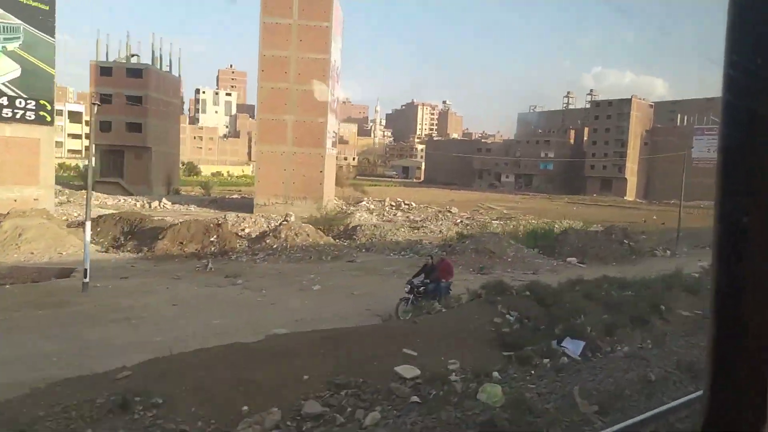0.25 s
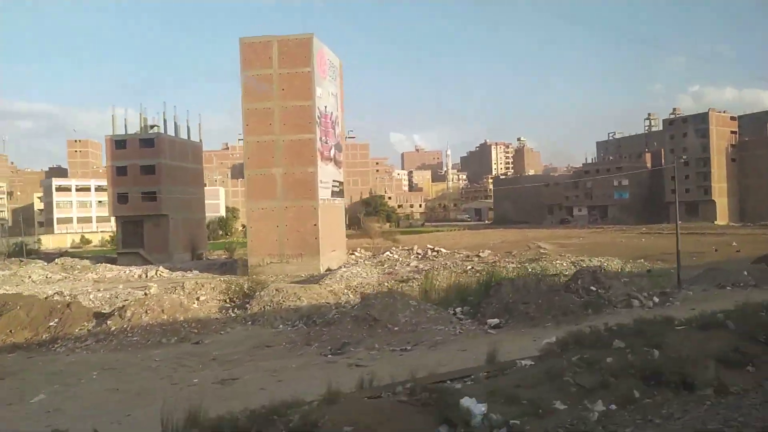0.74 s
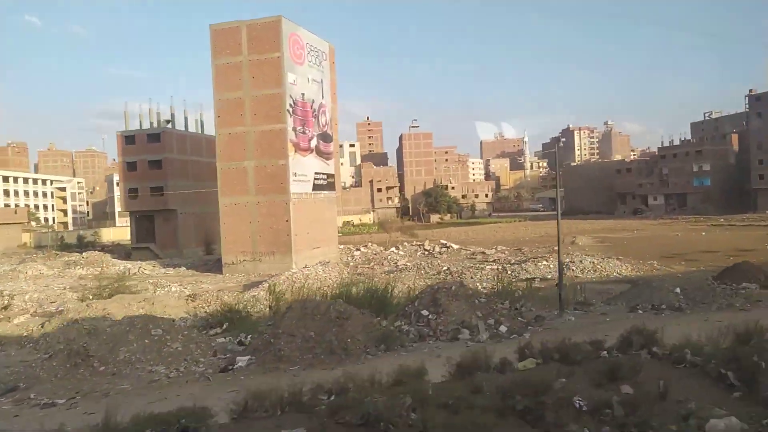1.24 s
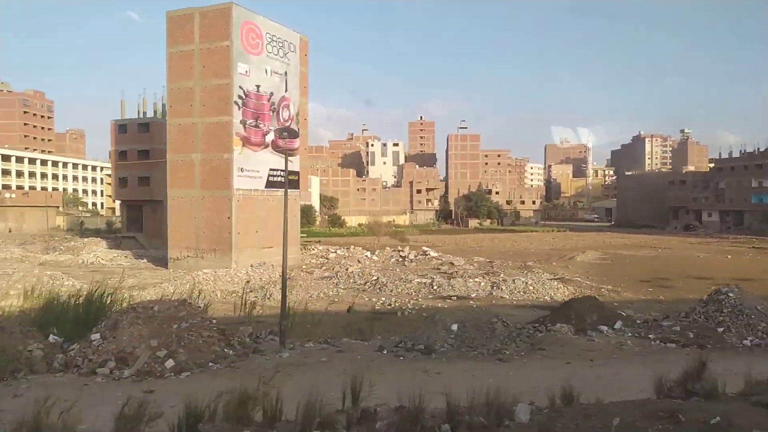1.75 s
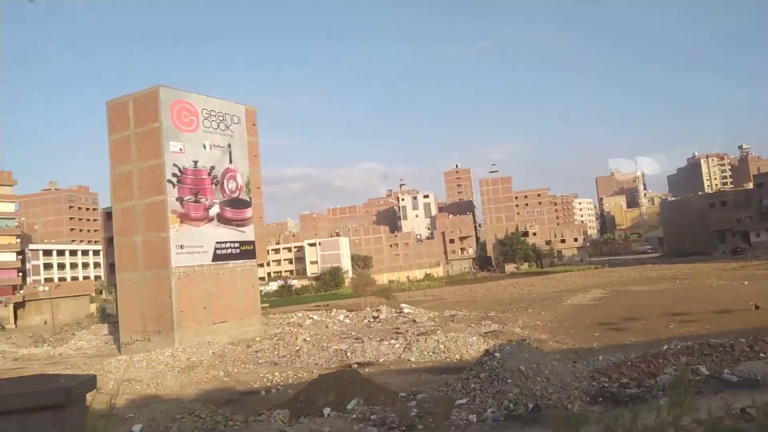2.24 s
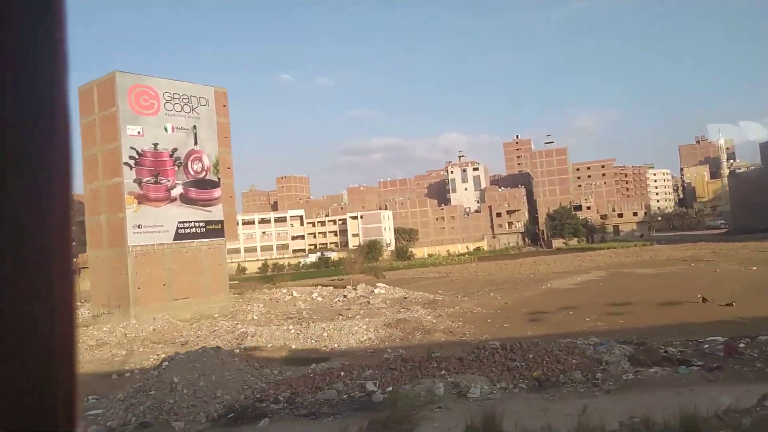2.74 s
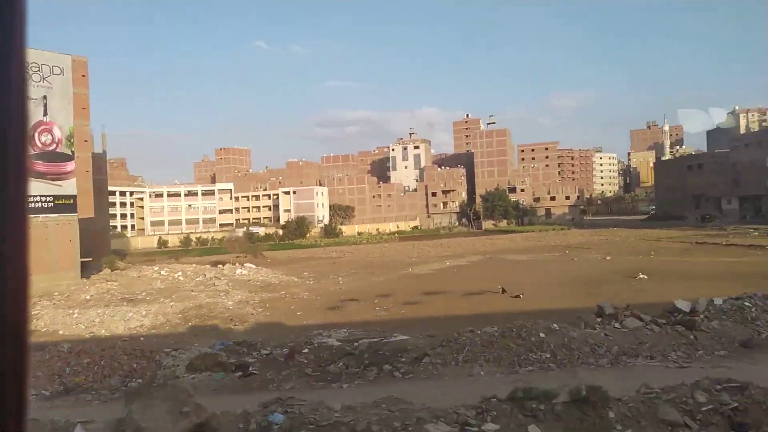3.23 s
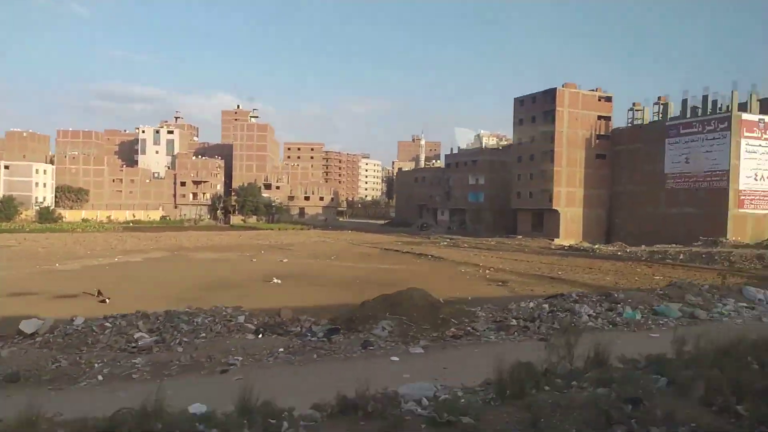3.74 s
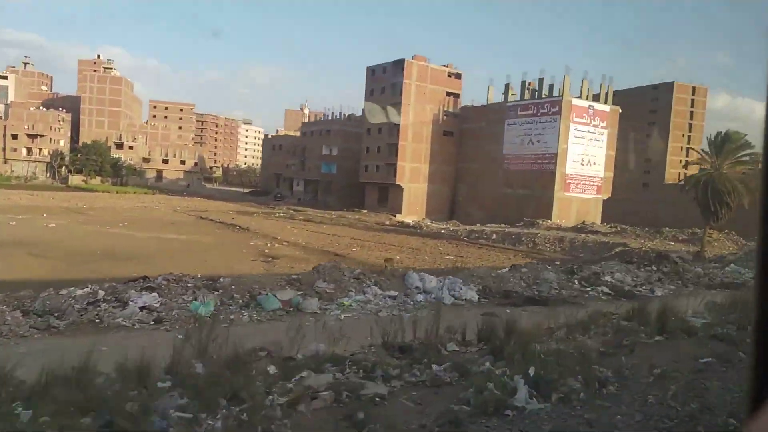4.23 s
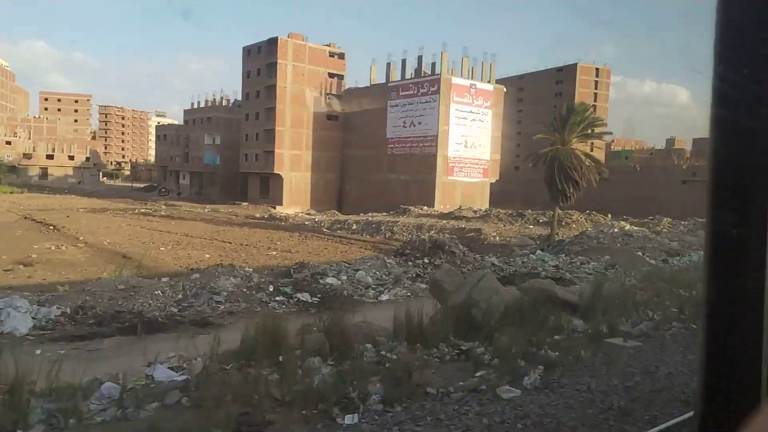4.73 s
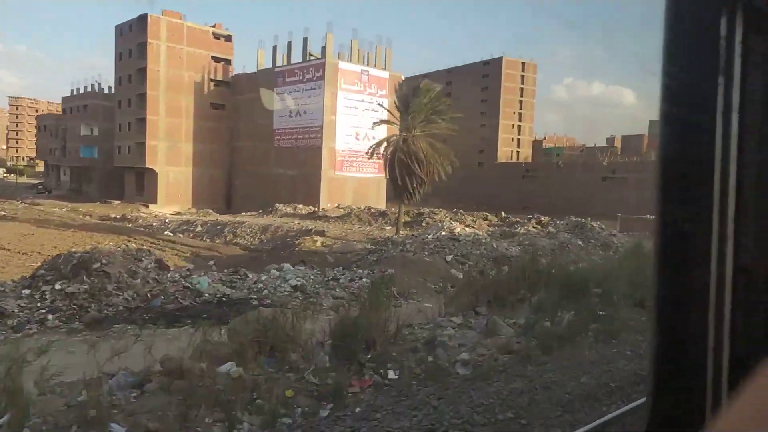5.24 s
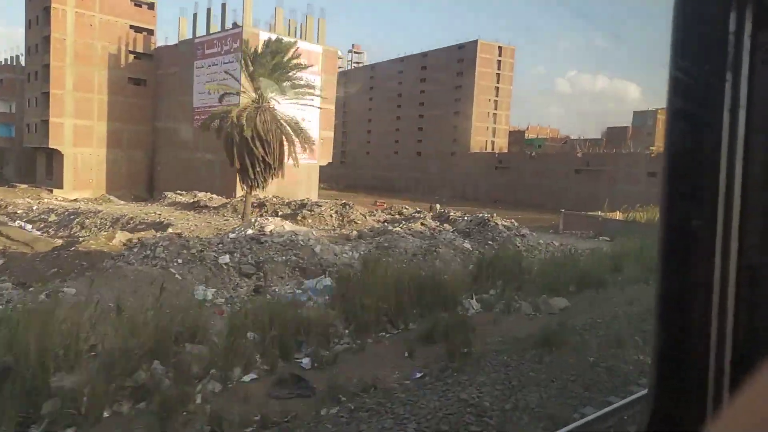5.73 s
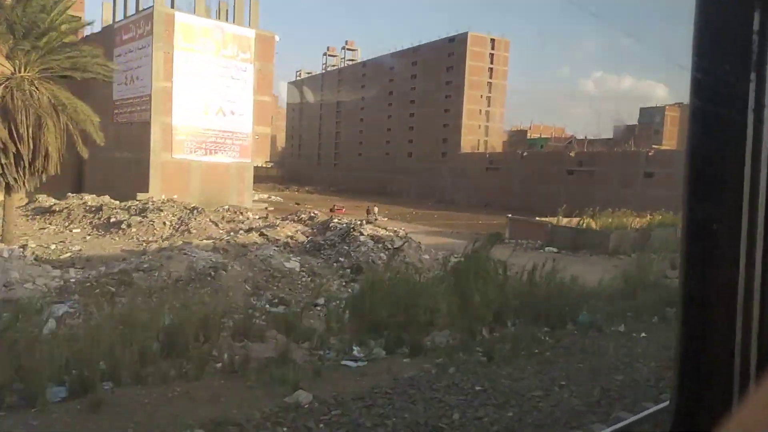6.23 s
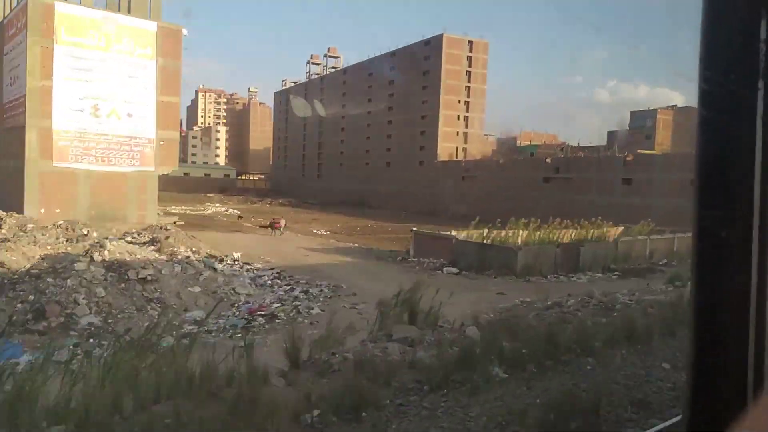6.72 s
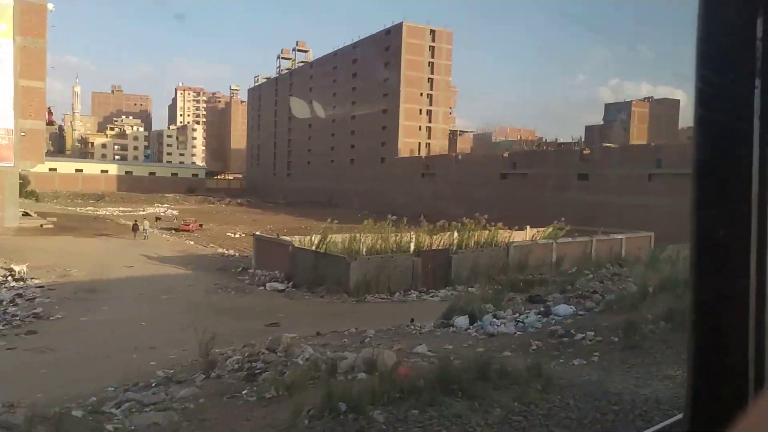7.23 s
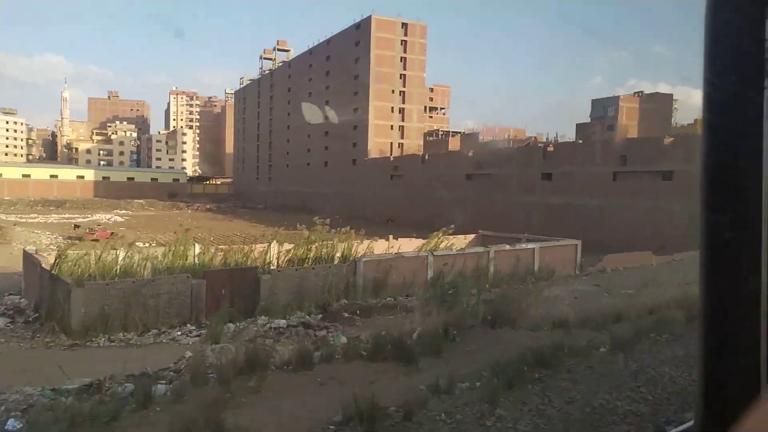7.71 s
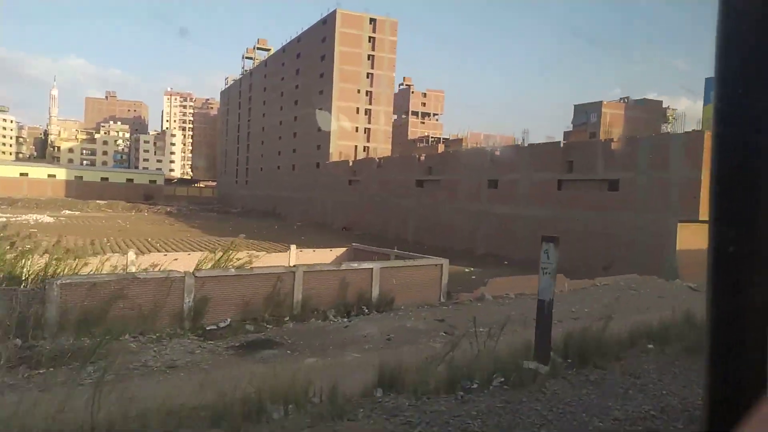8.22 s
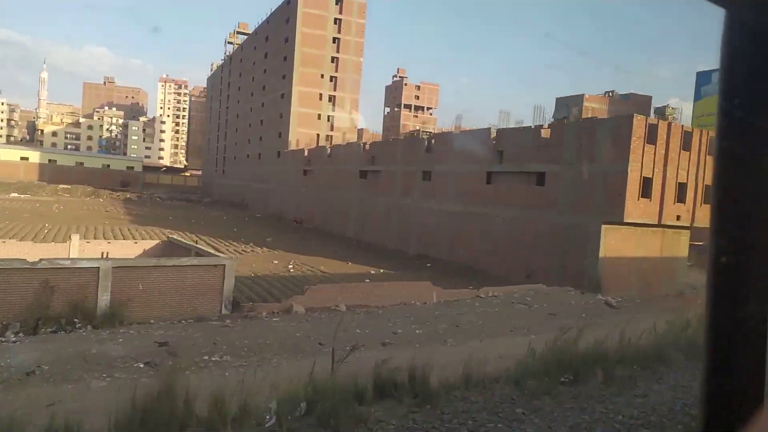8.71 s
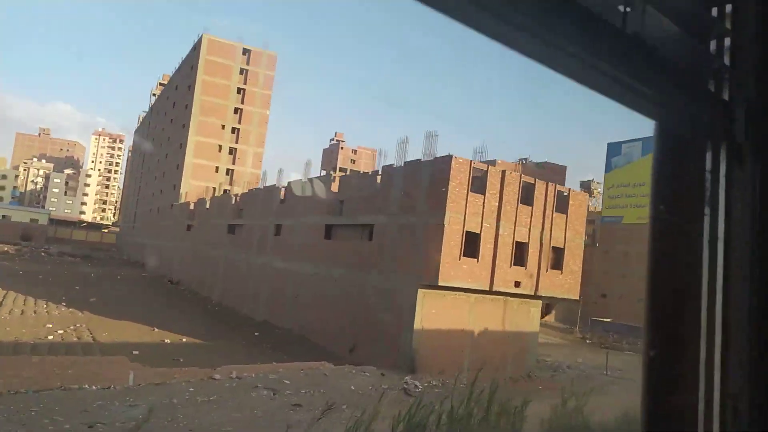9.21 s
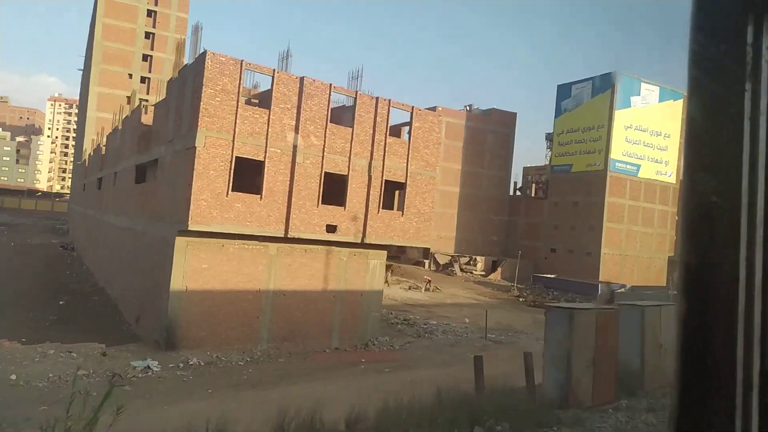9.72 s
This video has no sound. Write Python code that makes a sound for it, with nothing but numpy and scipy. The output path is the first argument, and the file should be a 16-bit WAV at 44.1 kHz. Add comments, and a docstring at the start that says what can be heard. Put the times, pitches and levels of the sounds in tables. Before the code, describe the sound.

Inside a moving train carriage, a deep steady rumble with soft uneven wheel bumps, low lurching thuds, muffled rolling noise and faint rattling fittings.

```python
"""Inside a rolling train carriage

The car body booms, the floor drums and the wall panels hum: noise shaped by resonances, louder on rough rail.
Lurches and wheel bumps add short low swings. Rolling noise comes through the walls, with wheel and rail singing.
Loose fittings rattle (patchy treble noise), knock (short bursts) and clink (two fading tones).
A joint squeaks very high as a sliding tone, and there is one short airy hiss."""
import sys
import numpy as np
from scipy import signal
from scipy.fft import rfft, irfft, next_fast_len
from scipy.io import wavfile
from scipy.ndimage import uniform_filter1d, map_coordinates

SR = 44100
rng = np.random.default_rng(int(sys.argv[2]) if len(sys.argv) > 2 else 0)


def generate_wav(sig):
    """Save sig (samples, or channels by samples) to the path in sys.argv[1] as 16-bit PCM at SR."""
    pcm = np.round(np.clip(np.atleast_2d(sig).T, -1, 1) * 32767).astype(np.int16)
    wavfile.write(sys.argv[1], SR, pcm)


N = 439236

# Lurches of the car body. Each row: time in seconds, peak level in dB, pitch at the peak in Hz.
LURCHES = [(0.176, -20.5, 58.6), (0.519, -26, 66), (0.595, -25, 80.5), (0.646, -18, 65.6),
           (1.201, -25, 69.6), (1.326, -18.5, 67.5), (1.372, -21, 58), (1.427, -17, 65), (1.52, -21, 58.5),
           (2.656, -24, 61.7), (2.702, -21, 73.6), (2.837, -19.5, 64), (2.956, -16, 64.5),
           (3.008, -13, 73.5), (3.076, -17, 61.5), (3.148, -18, 68), (3.414, -21, 69), (3.487, -22.5, 61.5),
           (3.738, -18.5, 62.4), (3.811, -28, 62), (3.929, -19, 66.5), (4.011, -25, 64.5), (4.354, -23, 77),
           (4.508, -22.5, 65.5), (4.759, -27, 71), (5.575, -21.5, 63), (5.625, -21, 62), (5.719, -21.5, 65),
           (7.041, -19.5, 62.7), (7.653, -25, 85), (7.763, -27, 83), (7.892, -23.5, 70.4), (7.943, -23, 73),
           (8.356, -23.5, 71), (9.257, -24.5, 67), (9.495, -23.5, 72.5)]
# Strong wheel bumps into the floor. Each row: time in seconds, peak level in dB, pitch in Hz.
STRONG_BUMPS = [(0.029, -23.5, 188), (0.125, -24, 186), (0.269, -26, 177), (0.494, -22, 175),
                (0.613, -19, 182), (0.736, -23, 191), (0.787, -21, 225), (1.072, -20.5, 173),
                (1.307, -16.5, 181), (1.41, -15.5, 190), (2.167, -25, 186), (2.269, -25, 173),
                (2.37, -22, 182), (2.538, -24, 186), (2.583, -20.5, 182), (2.707, -21, 184),
                (2.804, -19.5, 201), (2.921, -21, 193), (2.946, -20, 170), (2.998, -19, 185),
                (3.059, -15.5, 179), (3.106, -20.5, 178), (3.205, -22.5, 182), (3.245, -27, 200),
                (3.317, -19.5, 181), (3.618, -23, 189), (3.716, -23, 203), (3.781, -19, 200),
                (3.89, -17.5, 168), (4.21, -20, 180), (4.348, -20, 191), (4.442, -20, 180),
                (4.569, -22, 188), (4.815, -24.5, 195), (4.991, -23.5, 191), (5.1, -15.5, 179),
                (5.148, -20, 187), (5.33, -24, 193), (5.511, -21.5, 181), (6.176, -24, 188),
                (7.024, -21.5, 185), (7.279, -23, 178), (7.389, -19, 177), (7.494, -17.5, 177),
                (7.77, -17, 184), (7.869, -28, 198), (8.319, -31, 190), (8.422, -19.5, 181),
                (8.973, -23, 196), (9.139, -20.5, 172), (9.242, -20.5, 170), (9.298, -23.5, 197),
                (9.368, -22, 193), (9.471, -27, 180), (9.585, -21, 187), (9.681, -24.5, 202),
                (9.784, -24, 184)]
# Resonances of the wall panels. Each row: pitch in Hz, width in Hz, level in dB relative to each other.
WALL_PANELS = [(292, 81, 0), (363.8, 91, -0.5), (467, 154, -6)]
# The hardest jolt lifts rolling noise and wall panels: time in seconds, lift in dB, rise and fall in seconds.
HARDEST_JOLT = (3.012, 5.7, .02, 0.053)
LURCH_RISE_S, LURCH_FALL_S = 0.012, 0.022
BUMP_RISE_S, BUMP_FALL_S = 0.0091, 0.012


def amp(db):
    """Gain of a level in dB."""
    return 10 ** (np.asarray(db) / 20)


def unit(x):
    """Scale a sound to an rms of 1."""
    return x / np.sqrt(np.mean(x ** 2) + 1e-20)


def along(points, hz):
    """Read the columns of (Hz, value, ..) points at given frequencies, on a log axis."""
    knots, *columns = np.transpose(points)
    return np.squeeze([np.interp(np.log(hz + 1), np.log(knots + 1), column) for column in columns])


def curves(rows):
    """One value per sample for each column after the time."""
    times, *columns = np.transpose(rows)
    return [np.interp(np.arange(N) / SR, times, column) for column in columns]


def wobble(rate):
    """A smooth random curve through `rate` random points a second."""
    points = rng.standard_normal(int(N * rate / SR) + 4)
    return map_coordinates(points, [np.arange(N) * rate / SR])


def swells(rows):
    """Sum of bell-shaped swells (time s, height, rise s, fall s), drawn at 1000 points a second."""
    t = np.arange(0, N / SR, 1 / 1000)
    total = sum(height * np.exp(-.5 * ((t - s) / np.where(t < s, rise, fall)) ** 2)
                for s, height, rise, fall in rows)
    return np.interp(np.arange(N) / SR, t, total)


def filtered(x, response):
    """Apply a gain that depends on frequency."""
    m = next_fast_len(N + SR // 2)
    return irfft(rfft(x, m) * response(np.fft.rfftfreq(m, 1 / SR)), m)[..., :N]


def modes(table):
    """Gain of steep resonances (Hz, width Hz, dB) whose powers add."""
    def gain(f):
        power = 0
        for centre, width, db in table:
            resonance = (f * width) ** 2 / ((centre * centre - f * f) ** 2 + (f * width) ** 2)
            power = power + (amp(db) * resonance) ** 2
        return np.sqrt(power)
    return gain


def patchy(pair, depth_db, tall, long):
    """Noise with patches of random gain, tall frequency bins by long time frames."""
    spectrum = signal.stft(pair, nperseg=512)[2]
    field = rng.standard_normal(spectrum.shape[1:])
    field = uniform_filter1d(field, size=round(tall), axis=0)
    field = uniform_filter1d(field, size=round(long), axis=1)
    return signal.istft(spectrum * amp(depth_db * unit(field)), nperseg=512)[1][:, :N]


def rush(gain, patchy_db=None, tall=8, long=8):
    """Coloured stereo noise of rms 1, nearly alike in both ears only in the bass."""
    # Each row: frequency in Hz, left-right likeness from 0 to 1, phase lead of the right ear in radians.
    ear_likeness = [(40, .985, -.1), (215, .985, -.1), (300, .66, -.2), (430, .53, -.2), (600, .3, -1.6),
                    (900, .17, -2.4), (1030, .23, -.4), (1163, .34, -.2), (1290, .09, 0), (1464, .34, 2.1),
                    (1680, .42, .6), (1940, .19, .6), (2260, .05, 0)]
    pair = rng.standard_normal((2, N))
    if patchy_db:
        pair = patchy(pair, patchy_db, tall, long)
    m = next_fast_len(N)
    hz = np.fft.rfftfreq(m, 1 / SR)
    alike, lead = along(ear_likeness, hz)
    # more of the shared middle makes the ears more alike
    turn = np.arccos(np.clip(alike, -1, 1)) / 2
    mid, side = rfft(pair, m) * gain(hz) * np.array([np.cos(turn), np.sin(turn)])
    left = (mid + side) * np.exp(-.5j * lead)
    right = (mid - side) * np.exp(.5j * lead)
    return unit(irfft(np.array([left, right]), m)[:, :N])


def steadied(x, share):
    """Even out the swing, as a driven vibration is steadier than free noise."""
    swing = np.abs(signal.hilbert(x.mean(0), next_fast_len(N))[:N])
    return unit(x / (swing + 0.19) ** np.clip(share, 0, 1))


def body():
    """Rough rail drives the resonances of the car body, the floor and the wall panels."""
    # Roughness of the rail. Each row: time in seconds, roughness in dB.
    roughness = [(0, 0.5), (.35, -3), (1.4, 1.5), (1.9, -4), (3.05, 3), (3.4, -1.5), (3.85, 3), (4.2, 0),
                 (5.15, 2), (5.9, -4.5), (6.6, -4), (7.5, -1), (8.4, 1), (8.9, -3.5), (9.5, 1),
                 (9.96, -0.5)]
    # Resonances of the car body. Each row: pitch in Hz, width in Hz, relative level in dB.
    body_modes = [(55.8, 21.7, -2), (83.6, 14.7, -6), (106.3, 9.1, -4)]
    # Resonances of the floor panels. Each row: pitch in Hz, width in Hz, relative level in dB.
    floor_modes = [(137.2, 57, -6.5), (178.4, 54, -4), (224.2, 21, -6), (243, 15.5, -6)]
    boom_db, drum_db, panel_db = -31.5, -32.5, -46  # at zero roughness
    boom_follows, panel_follows = 0.57, 0.33  # dB per dB of roughness; the floor follows in full
    give_db = -1  # the free booming and drumming give way under a lurch or a strong bump

    rough_db, = curves(roughness)
    lurch = np.minimum(swells((s, 1, LURCH_RISE_S, LURCH_FALL_S) for s, *_ in LURCHES), 1)
    bump = np.minimum(swells((s, 1, 2 * BUMP_RISE_S, 2 * BUMP_FALL_S) for s, *_ in STRONG_BUMPS), 1)
    boom_level = boom_db + boom_follows * rough_db + give_db * lurch + 1.6 * wobble(17)
    boom = amp(boom_level) * steadied(rush(modes(body_modes)), share=0.41)
    drum_level = drum_db + rough_db + give_db * bump + 2.47 * wobble(14)
    drum = amp(drum_level) * steadied(rush(modes(floor_modes)), share=0.17)
    panel_level = panel_db + panel_follows * rough_db + swells([HARDEST_JOLT]) + 1.6 * wobble(11)
    return boom + drum + amp(panel_level) * rush(modes(WALL_PANELS))


def thuds():
    """Each lurch swings the car body for a few cycles that start high and sink."""
    sag_hz_per_s = 450
    out, t = np.zeros(N + SR), np.arange(-SR // 10, SR // 8) / SR
    swell = np.exp(-.5 * (t / np.where(t < 0, LURCH_RISE_S, LURCH_FALL_S)) ** 2)
    for s, db, hz in LURCHES:
        cycles = hz * t - sag_hz_per_s * t ** 2 / 2 + rng.random()
        out[round((s + t[0]) * SR):][:len(t)] += amp(db) * swell * np.sin(2 * np.pi * cycles)
    return out[:N]


def bumps():
    """Each bump swells and fades over a few cycles, softened by the springs, and shakes the wall panels."""
    small_per_s, scatter_s = 8.6, .02  # weak bumps keep a loose beat
    clear_s = .07  # and give way near strong ones
    small_db, small_spread_db = -30, 1
    small_hz, small_spread_hz = 180.7, 14
    shake_db = -21  # wall panels relative to the bump

    out, shake, t = np.zeros(N + SR), np.zeros(N + SR), np.arange(-SR // 40, SR // 8) / SR
    swell = np.exp(-.5 * (t / np.where(t < 0, BUMP_RISE_S, BUMP_FALL_S)) ** 2)
    beat = np.arange(0, N / SR, 1 / small_per_s)
    scatter, size, pitch = rng.standard_normal((len(beat), 3)).T
    times = np.abs(beat + scatter_s * scatter)
    rows = zip(times, small_db + small_spread_db * size, small_hz + small_spread_hz * pitch)
    small = [row for row in rows if min(abs(row[0] - strong[0]) for strong in STRONG_BUMPS) > clear_s]
    for s, db, hz in [*STRONG_BUMPS, *small]:
        start = max(round((s + t[0]) * SR), 0)
        out[start:][:len(t)] += amp(db) * swell * np.sin(2 * np.pi * (hz * t + rng.random()))
        shake[start:][:len(t)] += amp(db + shake_db) * swell
    return out[:N] + shake[:N] * rush(modes(WALL_PANELS))


def rolling():
    """Wheel noise through the walls, with wavering singing and brief pings of wheel and rail."""
    # Level of the rolling noise. Each row: time in seconds, level in dB.
    roll_level = [(0, -47), (.5, -45), (1.9, -45.5), (2.6, -45), (3.4, -45.5), (6.6, -46), (8.1, -45),
                  (8.9, -46), (9.3, -46), (9.96, -47)]
    # Colour of the rolling noise. Each row: frequency in Hz, relative level in dB per Hz.
    roll_colour = [(300, -27), (480, -1.5), (600, -1), (760, 0), (1000, 0), (1200, -4.5), (1380, -7),
                   (2080, -9.5), (4260, -16), (7000, -31.5), (9100, -46), (15400, -120)]
    # The rail pings briefly. Each row: time in seconds, peak level in dB.
    ping_times = [(3.04, -47), (5.031, -44), (6.279, -44.5), (6.809, -48), (6.954, -48), (8.02, -50),
                  (8.593, -49), (8.872, -53), (9.35, -50), (9.592, -46)]
    # Level of the singing. Each row: time in seconds, level in dB.
    singing_level = [(0, -55), (2.1, -58.5), (3.2, -57), (4.9, -54), (7.5, -57), (9.96, -55)]
    # Resonances of wheel and rail. Each row: pitch in Hz, width in Hz, relative level in dB.
    rail_modes = [(1633, 97, 0.5), (1718, 150, -1.5)]
    # The noise rings briefly on one note: time in seconds, rms level at the top in dB,
    # rise and fall in seconds (one value), pitch in Hz.
    one_note = (8.195, -47.5, .013, 955)
    ping_hz, ping_spread_hz = 1674, 45

    level_db = curves(roll_level)[0] + swells([HARDEST_JOLT]) + 0.27 * wobble(14)
    broad = amp(level_db) * rush(lambda hz: amp(along(roll_colour, hz)), patchy_db=1.7)
    t = np.arange(N) / SR
    ping = np.sin(2 * np.pi * np.cumsum(ping_hz + ping_spread_hz * wobble(12)) / SR)
    pings = swells((s, amp(db), .011, .012) for s, db in ping_times) * ping
    singing_db = curves(singing_level)[0] + 1.6 * wobble(25)
    singing = amp(singing_db) * rush(modes(rail_modes), patchy_db=2.0, tall=1, long=12)
    s, db, half, hz = one_note
    hoot = swells([(s, amp(db), half, half)]) * np.sqrt(2) * np.sin(2 * np.pi * hz * t)
    return broad + hoot + singing + pings


def rattle():
    """Loose fittings chatter in the treble, as noise with short patches wide in frequency."""
    # Level of the rattle. Each row: time in seconds, level in dB.
    rattle_level = [(0, -56.5), (.4, -58.5), (1.5, -57), (2.25, -64.5), (2.6, -55.5), (2.96, -53),
                    (3.04, -45.5), (3.5, -59.5), (3.92, -53.5), (4.25, -59.5), (4.55, -53.5), (5.1, -58.5),
                    (5.35, -53.5), (5.75, -62), (6.13, -58), (6.2, -56), (6.3, -57), (6.4, -62.5),
                    (6.95, -61.5), (7.05, -58.5), (7.75, -59.5), (8.3, -53.5), (8.75, -55.5), (8.95, -62),
                    (9.35, -55), (9.96, -58)]
    # Colour of the rattle. Each row: frequency in Hz, relative level in dB per Hz.
    rattle_colour = [(2060, -12), (3500, -5), (5980, -6), (9540, -8), (11600, -15), (14000, -17),
                     (14700, -26), (15500, -41)]
    level_db = curves(rattle_level)[0] + 0.47 * wobble(10.0) + 1.0 * wobble(21)
    noise = rush(lambda hz: amp(along(rattle_colour, hz)), patchy_db=3.5, tall=14.3, long=4)
    return amp(level_db) * noise


def clacks():
    """Fittings knock: short bursts of noise, smeared by the cabin."""
    # Each row: time in seconds, rms level in dB before the fade, brightness in dB per octave.
    knocks = [(1.4644, -53, 4), (3.0002, -37.5, -8.5), (3.027, -45, 0), (3.059, -46, 2), (3.0647, -44.5, 7),
              (3.091, -55, -16), (6.17, -46, -7), (6.263, -44, -14), (7.03, -51, -2.5), (8.084, -48, 0),
              (8.8653, -46.5, 1)]
    out, t = np.zeros((2, N + SR)), np.arange(SR // 8) / SR
    hz = np.fft.rfftfreq(len(t), 1 / SR) + 1
    # a crack, then the cabin's tail
    shape = (1 - np.exp(-t / .001)) * (amp(-60 * t / .03) + .7 * amp(-60 * t / .15))
    for s, db, tilt_db in knocks:
        colour = amp(tilt_db * np.log2(hz / 7000)) / (1 + (900 / hz) ** 4) / (1 + (hz / 12000) ** 6)
        burst = unit(irfft(rfft(rng.standard_normal((2, len(t)))) * colour, len(t)))
        out[:, round(s * SR):][:, :len(t)] += amp(db) * shape * burst
    return out[:, :N]


def clink():
    """A small metal part touches and bounces: two short tones, roughened by a fast waver in phase."""
    # The touches. Each row: time in seconds, level in dB before the onset and fade.
    touches = [(.4515, -45.5), (.465, -49)]
    # Tones of the part. Each row: pitch in Hz, relative level in dB, time to fade by 60 dB in seconds.
    metal_tones = [(3170, 3, .05), (5010, 1, .04)]
    out, waver = np.zeros(N), 0.9 * wobble(400)  # radians
    for s, level_db in touches:
        t = np.clip(np.arange(N) / SR - s, 0, None)
        ring = sum(amp(db - 60 * t / t60) * np.sin(2 * np.pi * hz * t + waver) for hz, db, t60 in metal_tones)
        out += amp(level_db) * (1 - np.exp(-t / .0015)) * ring
    return out


def squeaks():
    """A joint squeaks: a 12 ms tone slides down a little, then rings unevenly in the cabin."""
    # Each row: time in seconds, level in dB, pitch it settles on in Hz, left-right difference in dB.
    joint_squeaks = [(2.5327, -52, 14900, 4), (2.639, -48, 14900, 3), (2.84, -47, 14250, 13),
                     (2.9393, -49, 13900, -3), (3.0635, -53, 14700, -2), (3.4212, -51, 13900, -3.0),
                     (4.015, -31, 13800, 7), (4.1296, -48, 14300, 0), (5.5658, -44, 14600, 7),
                     (6.8504, -51, 14400, 3.5), (6.9572, -51, 14500, 5), (7.042, -56, 14800, 7),
                     (7.892, -40.5, 14900, 9)]
    out, t = np.zeros((2, N + SR)), np.arange(SR // 6) / SR
    for s, db, hz, pan_db in joint_squeaks:
        slide = 2 * np.pi * np.cumsum(hz + 300 * np.exp(-t / 0.0039)) / SR
        window = np.sin(np.pi * np.clip(t / .012, 0, 1)) ** 2
        direct = window * np.sin(slide) * amp([[pan_db / 2], [-pan_db / 2]])
        # slow random gains make the ringing uneven
        beats = uniform_filter1d(rng.standard_normal((2, 2, len(t))), size=60)
        ring = unit(beats[0] * np.sin(slide) + beats[1] * np.cos(slide))
        fade = amp(-3 - 60 * t / 0.1) * (1 - np.exp(-t / .008))
        out[:, round((s - .003) * SR):][:, :len(t)] += amp(db) * (direct + fade * ring)
    return out[:, :N]


def hiss():
    """A short, thin, air-like noise shaped by two high resonances."""
    # Each row: time in seconds, level in dB.
    hiss_level = [(7.9, -80), (8.1, -56.5), (8.35, -57), (8.62, -66), (8.8, -80)]
    # Resonances of the hiss. Each row: pitch in Hz, width in Hz, relative level in dB.
    hiss_modes = [(8300, 1200, -6), (9700, 830, -7)]
    return amp(curves(hiss_level)[0]) * rush(modes(hiss_modes), patchy_db=2.5, tall=5, long=5)


def scene():
    """Everything heard in the carriage; all but the bass layers drops out for a moment."""
    # The dropout: centre in seconds, half length in seconds.
    dropout = (4.617, .0045)
    centre_s, half_s = dropout
    from_centre_s = np.abs(np.arange(N) / SR - centre_s)
    dip = np.clip((from_centre_s - half_s) / 0.00032, .03, 1)
    bass = body() + thuds() + bumps()
    return bass + dip * (rolling() + rattle() + clacks() + clink() + squeaks() + hiss())


def record(dry):
    """Two microphones lean left or right by band, lose the deepest bass and keep nothing above a limit."""
    # Each row: frequency in Hz, left-right difference in dB.
    left_right = [(60, 1), (430, -1.5), (650, 0), (1040, 4), (1250, 0.5), (4000, 0.7)]
    low_hz, top_hz = 30, 15500

    def response(hz):
        lean = amp(np.outer([.5, -.5], along(left_right, hz)))
        return lean / np.sqrt(1 + (low_hz / (hz + 1)) ** 8) * (hz < top_hz)
    return filtered(dry, response)


dry = scene()
out = record(dry)
generate_wav(out)
```